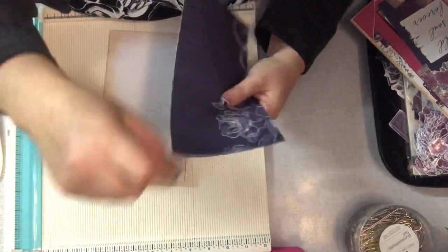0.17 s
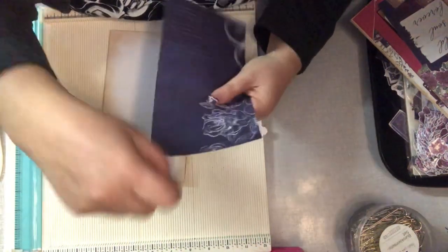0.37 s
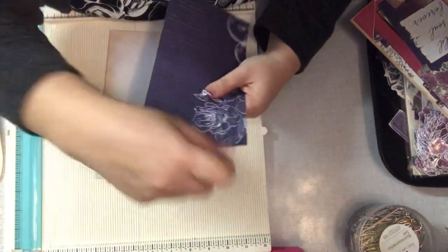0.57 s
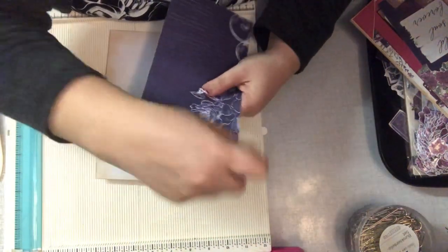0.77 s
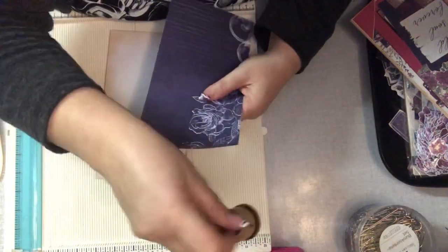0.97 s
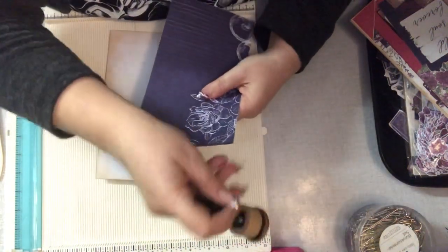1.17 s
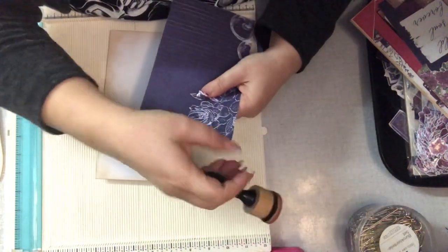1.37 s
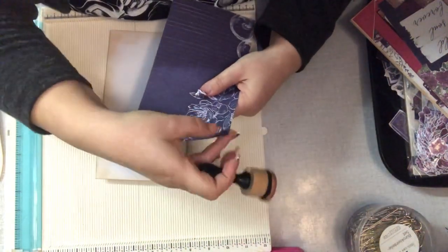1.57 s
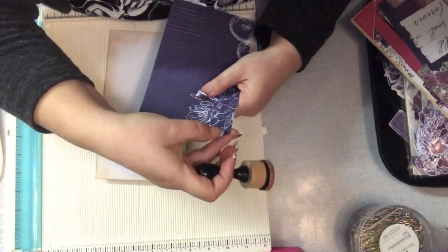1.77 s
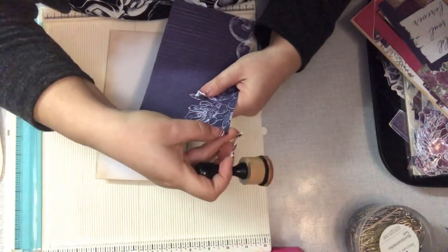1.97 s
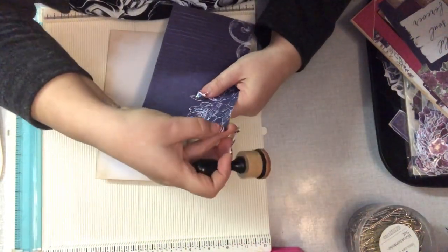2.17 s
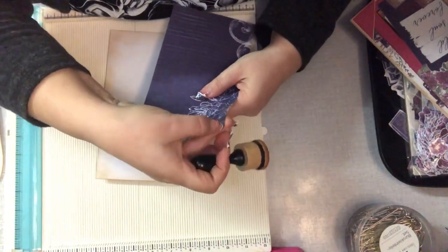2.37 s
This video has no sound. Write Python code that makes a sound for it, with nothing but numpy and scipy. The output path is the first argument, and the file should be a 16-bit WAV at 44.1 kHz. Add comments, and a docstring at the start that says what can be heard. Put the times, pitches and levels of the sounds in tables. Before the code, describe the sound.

A foam ink tool swipes a card's edge five times in the first 0.9 seconds, each short scrape making the card flap. The second catches with a loud snap at 0.2 seconds; the last ends in a wooden knock and low table bump at 0.8. Nails tick faintly around 1.2, then fingertips softly rub and nudge the card from 1.5 to 2.5. Everything is close, over a quiet room hum.

```python
"""Foam ink tool on the edge of a card

A foam tool is swiped five times over a hand-held card, close above a table in a quiet, humming room.
Friction makes each scrape, and the card springs back and flaps in its bending modes. On the second
swipe the edge catches and snaps loudly; the last ends in a knock. Then nails tick on the card and
fingertips rub and nudge it."""
import sys
import numpy as np
from scipy import signal
from scipy.fft import rfft, irfft
from scipy.io import wavfile
from scipy.ndimage import uniform_filter1d

SR = 44100
rng = np.random.default_rng(int(sys.argv[2]) if len(sys.argv) > 2 else 0)


def master_out(mix):
    """Clip the mix to full scale and print it as 16-bit PCM to the path in sys.argv[1]."""
    frames = np.transpose(np.atleast_2d(mix))
    ceiling = np.clip(frames, -1, 1)
    pcm = np.round(ceiling * 32767).astype(np.int16)
    wavfile.write(sys.argv[1], SR, pcm)


N = 110250
T = np.arange(N) / SR

# modes of the card's edge: pitch_hz, level_db, t60_s
EDGE_MODES = [(1030, -7, .07), (1648, -14.5, 0.09), (1784, -10, 0.049), (2291, 3, 0.019),
              (2595, -4.5, 0.05), (2757, -8, 0.043), (2890, -1.5, .036), (3270, -8.5, 0.054),
              (3740, -9.5, .05), (4110, -5, 0.034), (4200, -6.5, 0.037), (4650, -5, 0.05),
              (5186, -11.5, .045)]


def undb(db):
    """Amplitude ratio of a level in decibels."""
    return 10 ** (np.asarray(db) / 20)


def unit_rms(x):
    """Normalisation to a mean power of 1."""
    return x / np.sqrt(np.mean(x ** 2))


def unit_burst(x):
    """Normalisation of a transient: its loudest 4 ms have rms 1."""
    return x / np.sqrt(uniform_filter1d(x ** 2, size=176).max())


def colour(x, points, tilt_db=0):
    """Minimum-phase filter through (hz, db) points, tilted per octave; white noise keeps its power."""
    hz, db = np.array(points, float).T
    octave = np.log2(np.maximum(np.fft.rfftfreq(8192, 1 / SR), 10))
    gain_db = np.interp(octave, np.log2(hz), db) + tilt_db * np.maximum(octave, np.log2(hz[0]))
    cepstrum = irfft(np.log(undb(gain_db)))
    half = len(cepstrum) // 2
    causal = 2 * cepstrum[:half] * (np.arange(half) > 0)
    response = irfft(np.exp(rfft(causal, len(cepstrum))))[:half]
    return signal.fftconvolve(x, response / np.linalg.norm(response))[:len(x)]


def resonate(x, hz, q):
    """Forced response of a second-order resonator with quality factor q."""
    return signal.lfilter(*signal.iirpeak(hz, q, fs=SR), x)


def fade(t, t60):
    """Exponential damping from t = 0, by 60 dB in t60 seconds."""
    return (t >= 0) * np.exp(-np.log(1000) * np.maximum(t, 0) / max(t60, 1e-3))


def wander(rate_hz):
    """Slow random modulation: smoothed steps with rms 1."""
    hold = int(SR / rate_hz)
    steps = np.repeat(rng.standard_normal(N // hold + 1), hold)
    return unit_rms(uniform_filter1d(uniform_filter1d(steps, hold), hold)[:N])


def add(out, start_s, x):
    """Superposition of x on out from start_s on."""
    i = int(np.clip(start_s * SR, 0, N - 1))
    out[i:i + len(x)] += x[:N - i]


def hum(levels, pitch_hz, waver_db, level_rate_hz, waver_hz, pitch_rate_hz):
    """A low sine tone wavers by random amplitude and frequency modulation."""
    level_db = np.interp(T, *np.array(levels).T) + waver_db * wander(level_rate_hz)
    hz = pitch_hz + waver_hz * wander(pitch_rate_hz)
    return undb(level_db) * np.sqrt(2) * np.sin(2 * np.pi * np.cumsum(hz) / SR)


def background():
    """Ambient sound: two hums superposed on steady broadband noise."""
    # course of each hum: time_s, level_db
    lower_levels = [(.85, -52.5), (1.05, -56)]
    upper_levels = [(0, -64), (.4, -68.5), (.8, -77), (1.2, -61.5), (1.45, -58.5), (1.6, -54), (1.76, -64),
                    (2.1, -66.5), (2.5, -71)]
    # spectrum of the room noise: frequency_hz, level_db
    noise_spectrum = [(20, -2.5), (50, 5), (80, 7), (140, 1), (220, -8), (450, -8), (700, -14.5),
                      (1500, -17.5), (2500, -22), (5500, -26), (10000, -34), (14300, -36), (15500, -48)]
    lower = hum(lower_levels, 51.9, waver_db=2, level_rate_hz=23, waver_hz=1.4, pitch_rate_hz=39)
    upper = hum(upper_levels, 116.7, waver_db=.63, level_rate_hz=7.7, waver_hz=1.1, pitch_rate_hz=11)
    return lower + upper + undb(-60) * colour(rng.standard_normal(N), noise_spectrum)


def room(x):
    """Reverberation: wall echoes in a small room build up to a diffuse, decaying tail."""
    # spectrum of the tail: frequency_hz, level_db
    tail_spectrum = [(150, 0), (500, -4), (1000, -9), (1900, -2.5), (2500, -7.5), (3700, 3.5), (4800, -2.5),
                     (5800, 1.5), (7000, -0.5), (14000, -5.5)]
    t, build_s = T[:SR], .032
    echoes = rng.standard_normal(len(t)) * fade(t, t60=.38) * np.minimum(t / build_s, 1) ** 2
    tail = colour(echoes, tail_spectrum)
    return undb(-20.5) * signal.fftconvolve(x, tail / np.linalg.norm(tail))[:N]


def friction(strokes, spectrum, attack_s=.00081, release_s=.008, grain=.42):
    """Friction noise: dense, uneven fibre catches, filtered by the card."""
    out, t = np.zeros(N), T[:SR // 4]
    for start, length, db, rise_db, tilt_db in strokes:
        noise = rng.standard_normal(len(t))
        roughness = np.repeat(rng.standard_normal(len(t)), SR // 3000)[:len(t)]
        catches = unit_rms(noise * np.exp(grain * roughness))
        contact = np.minimum(t / attack_s, 1) * np.exp(-np.maximum(t - length, 0) / release_s)
        gain = undb(db + rise_db * (np.minimum(t / length, 1) - .5))
        add(out, start, colour(catches * contact * gain, spectrum, tilt_db))
    return out


def fingers():
    """Sliding friction of skin: fingertips rub the card and its edge slips between them."""
    # strokes of each kind: start_s, length_s, level_db, rise_db, tilt_db_per_octave
    rubs = [(.797, 0.013, -54.5, 2.5, 0.5), (.90, 0.041, -59.5, -1, 0.5), (1.535, 0.028, -61.5, 10.5, -2.5),
            (1.595, 0.041, -63, 6, 1), (1.664, 0.0062, -55, -5.5, -0.5), (1.68, 0.023, -62.5, -7, 1),
            (1.714, 0.019, -54, -6, -1.5), (1.771, 0.044, -54, 0, 0.5), (1.838, 0.011, -59.5, -0.5, 0.5),
            (1.858, 0.035, -56.5, -6.5, -1), (1.913, 0.0075, -55, -6, -1.5), (1.96, 0.15, -68, -2, 0),
            (2.057, 0.015, -49, -6, -1.5), (2.117, 0.011, -55, 3, 2), (2.135, 0.075, -54.5, 0.5, 0.3),
            (2.206, 0.0056, -58, -6, -1), (2.22, 0.051, -63.5, -1, 0), (2.283, 0.015, -57.5, 3, -2),
            (2.353, 0.032, -57.5, -4.5, 1.5), (2.39, 0.12, -65, -8.5, 1)]
    slips = [(1.822, 0.032, -63, 3.5, 1.5), (1.96, 0.084, -65.5, 4, -4.5), (2.2075, 0.004, -49, -12, 0.5),
             (2.235, 0.022, -66.5, 2, -5), (2.2855, 0.0049, -59, -9, -6), (2.303, 0.005, -59.5, 2, -14),
             (2.355, 0.036, -60, 1, -2.5)]
    # their spectra: frequency_hz, level_db
    rub_spectrum = [(150, -11.5), (460, -4.5), (880, -9.5), (1120, 3), (1600, -5.5), (2100, -12),
                    (2400, -7), (2900, -20), (3700, -12.5), (4600, -18), (7400, -25.5), (9000, -29),
                    (15500, -38)]
    slip_spectrum = [(800, -28), (2000, -4), (3000, -1.5), (3700, 3), (4600, -14), (7400, -16), (9000, -33),
                     (15500, -37)]
    return friction(rubs, rub_spectrum) + friction(slips, slip_spectrum)


def ticks():
    """Light impacts of the tool's rim or a nail: bright scratches, some with a thin resonance."""
    # impacts on the card: start_s, level_db, t60_s, relative_ring_db, ring_hz
    flicks = [(0.0325, -48.5, 0.015, -3, 3200), (.427, -47, 0.0094, -4.5, 2850),
              (1.1483, -54.5, .039, -26, 5700), (1.1672, -53.5, 0.0067, -13, 5700),
              (1.2024, -56.5, .06, -19, 5700), (1.2171, -53, 0.043, 1.5, 5620),
              (1.221, -52.5, 0.017, -3.5, 6300), (1.665, -61, .024, -17.5, 4787),
              (1.7705, -57.5, 0.014, -7, 7370), (1.839, -65, .047, 0, 7400)]
    # spectrum of a scratch: frequency_hz, level_db
    nail_spectrum = [(500, -1.5), (1800, -3.5), (4000, 5.5), (7000, -4.5), (11000, -12.5), (15500, -14.5)]
    out, t, bandwidth_hz = np.zeros(N), T[:SR // 8], 250
    for start, db, t60, ring_db, hz in flicks:
        burst = rng.standard_normal(len(t)) * fade(t, t60)
        scratch = unit_burst(colour(burst, nail_spectrum))
        ring = unit_burst(resonate(burst, hz, q=hz / bandwidth_hz))
        add(out, start, undb(db) * (scratch + undb(ring_db) * ring))
    return out


def table_knock():
    """Impact excites damped modes: tool and hand land with a wooden knock and a deep table bump."""
    knock_age, knock_hz = T - .838, 1484
    bump_age, bump_hz = T - .84, 49
    envelope = np.clip(knock_age * knock_hz / 2, 0, 1) * fade(knock_age, t60=.018)
    knock = unit_burst(envelope * np.sin(2 * np.pi * knock_hz * knock_age))
    bump = fade(bump_age, t60=.41) * np.sin(2 * np.pi * bump_hz * bump_age)
    return undb(-35) * knock + undb(-43) * bump


def bending_wave(t, hz, t60):
    """Dispersion: low bending waves arrive later. Gives the time since arrival and the envelope."""
    lag_at_500_hz_s = .0025
    age = t - lag_at_500_hz_s * np.sqrt(500 / hz)
    return age, np.clip(age * hz, 0, 1) * fade(age, t60)


def flaps():
    """Free vibration: the card springs back or is bumped and rings in its bending modes."""
    # excitations of the card: start_s, level_db, tilt_db_per_octave
    jolts = [(0.0329, -49.5, -2), (.2245, -29.5, 3), (.229, -35, 3.5), (0.4262, -46.5, -2.5),
             (.445, -50, -7.5), (0.5942, -46, -5.5), (.644, -44, -5), (.665, -48, -9), (0.838, -35, -3),
             (0.852, -42, -1.5), (1.772, -51, 8), (2.059, -55.5, 6), (2.119, -53.5, 11)]
    # main bending modes: pitch_hz, level_db, t60_s
    modes = [(162, -18.5, .09), (245, -6, .08), (344.4, -3, 0.06), (436.2, -6, 0.089), (534, 1, 0.085),
             (792, -9, 0.13), (1050, -0.5, .09), (1216, -1, .08), (1469, 1.5, 0.038), (1928, -11, 0.05)]
    # bands of waves too dense to hear apart: centre_hz, level_db, t60_s
    bands = [(197, -9.5, 0.0797), (298, -2.5, 0.072), (417, -1.5, 0.12), (625, 2, 0.07), (910, 0.5, 0.053),
             (1420, -3.5, 0.07), (2120, -14, .04)]
    out, t = np.zeros(N), T[:SR // 4]
    grip_scatter, lead_s = .015, .00125  # the grip shifts each mode by a random share of its pitch
    for start, db, tilt_db in jolts:
        shifts = 1 + grip_scatter * rng.standard_normal(len(modes))
        phases = rng.random(len(modes))
        ring = rattle = 0
        for (hz, mode_db, t60), shift, phase in zip(modes, shifts, phases):
            age, envelope = bending_wave(t, hz, t60)
            wave = np.sin(2 * np.pi * (hz * shift * age + phase))
            ring += undb(mode_db + tilt_db * np.log2(hz)) * envelope * wave
        for hz, band_db, t60 in bands:
            _, envelope = bending_wave(t, hz, t60)
            bandpass = signal.butter(2, [hz / 1.25, hz * 1.25], 'band', fs=SR, output='sos')
            band = signal.sosfilt(bandpass, rng.standard_normal(len(t)))
            rattle += undb(band_db + tilt_db * np.log2(hz)) * unit_burst(band * envelope)
        add(out, start - lead_s, undb(db - 1.5) * unit_burst(ring) + undb(db - 2.5) * unit_burst(rattle))
    return out


def edge_ring(scrape):
    """Forced vibration: scraping keeps the modes of the card's edge ringing."""
    return sum(undb(db / 2) * resonate(scrape, hz, q=np.pi * hz * t60 / np.log(1000))
               for hz, db, t60 in EDGE_MODES)


def swipes():
    """Friction of the foam drives two resonances of the card, set by where the tool meets the edge."""
    # foam strokes: start_s, length_s, level_db, rise_db, tilt_db_per_octave, low_hz, high_hz, hiss_db
    strokes = [(.006, 0.03, -48, 8, 3, 1040, 3240, -8.5), (0.185, 0.061, -49, 3.5, 4.5, 1250, 2760, -3),
               (.377, 0.056, -48, 0.5, 0.2, 1030, 1990, -0.5),
               (0.5932, 0.0056, -51.5, -2.5, 1, 1102, 2720, -2),
               (0.606, 0.03, -45, 0.5, -1.85, 1237, 2605, 6.5),
               (0.809, 0.033, -49, 3.5, -0.5, 1118, 3400, 6.5),
               (0.849, 0.017, -52.5, -9, -0.5, 1200, 4750, 4)]
    # spectrum of the scrape: frequency_hz, level_db
    foam_spectrum = [(150, -5.5), (600, -6.5), (1100, 0), (1550, -4), (2200, -1), (3300, -4.5), (5500, -11),
                     (8000, -17), (11000, -24.5), (15500, -35.5)]
    out, bandwidth_hz, hiss_above_hz = np.zeros(N), 120, 10000
    for *stroke, low_hz, high_hz, hiss_db in strokes:
        spectrum = [(hz, db + hiss_db * (hz > hiss_above_hz)) for hz, db in foam_spectrum]
        scrape = friction([stroke], spectrum, attack_s=.0079, release_s=.006, grain=.43)
        resonances = sum(resonate(scrape, hz, q=hz / bandwidth_hz) for hz in (low_hz, high_hz))
        out += scrape + undb(1.5) * resonances + undb(-6.5) * edge_ring(scrape)
    return out


def snap():
    """Stick-slip release of the caught edge. Gives a double crack with dying flutter, and its ring."""
    # spectrum of the crack: frequency_hz, level_db
    crack_spectrum = [(150, -33), (1250, -9), (1900, -10), (2350, 3), (2950, 2), (3600, 2), (4800, -2.5),
                      (6100, -12), (8500, -21.5), (10500, -28.5), (12500, -55.5), (16000, -67)]
    start_s, reslip_s = .2242, .00038  # the edge catches once more just after letting go
    out, ringing, t = np.zeros(N), np.zeros(N), T[:SR // 4]
    impulses = (t == 0) + undb(-5) * np.sinc((t - reslip_s) * SR)
    crack = colour(impulses, crack_spectrum)
    ring = 0
    for hz, db, t60 in EDGE_MODES:
        envelope = np.clip(t * hz / 2, 0, 1) * fade(t, t60)
        ring += undb(db) * envelope * np.sin(2 * np.pi * (hz * t + rng.random()))
    flutter = colour(rng.standard_normal(len(t)) * fade(t, t60=.044), crack_spectrum, tilt_db=1.06)
    add(out, start_s, undb(-10) * unit_burst(crack) + undb(-18) * unit_burst(flutter))
    add(ringing, start_s, undb(-19) * unit_burst(ring))
    return out, ringing


def scene():
    """Direct sound and reverberation add; the snap's ring, the knock and the background stay dry."""
    crack, ringing = snap()
    handling = fingers() + swipes() + flaps() + ticks() + crack
    return (handling + room(handling) + ringing + table_knock() + background())[None]


def record(dry):
    """Band limiting: a steep low-pass filter cuts the highest treble."""
    cutoff_hz = 15400
    return signal.sosfilt(signal.ellip(8, .2, 70, cutoff_hz, fs=SR, output="sos"), dry)


dry = scene()
out = record(dry)
master_out(out)
```